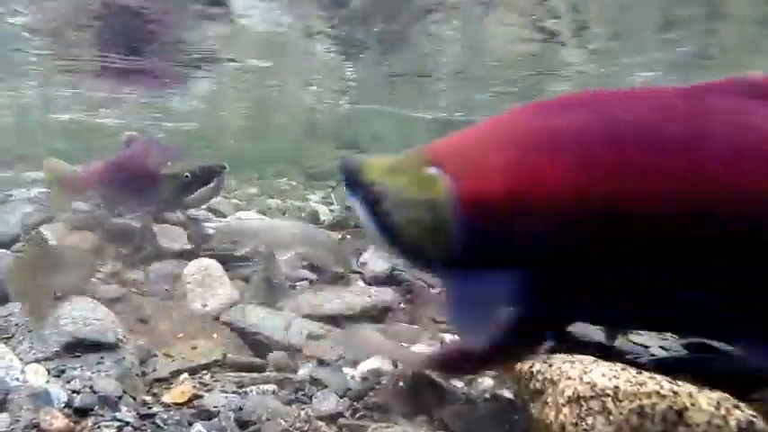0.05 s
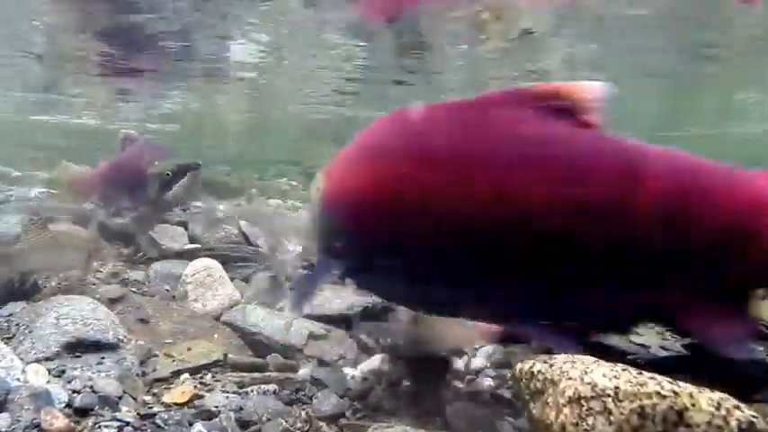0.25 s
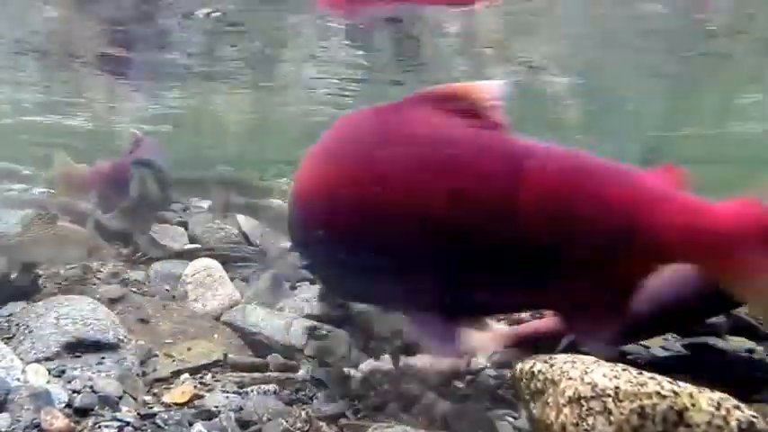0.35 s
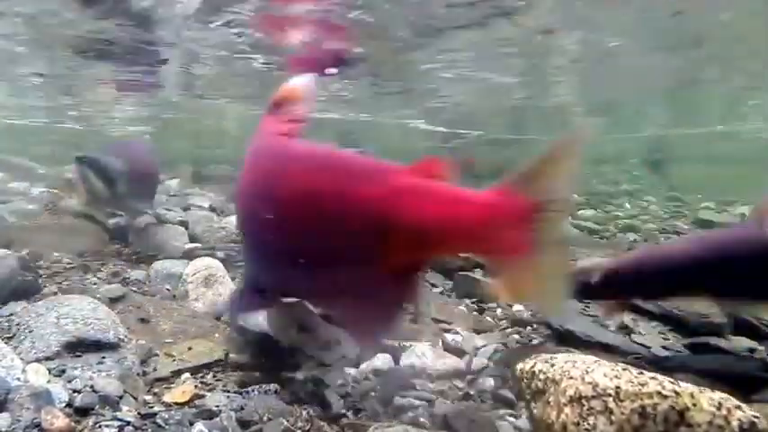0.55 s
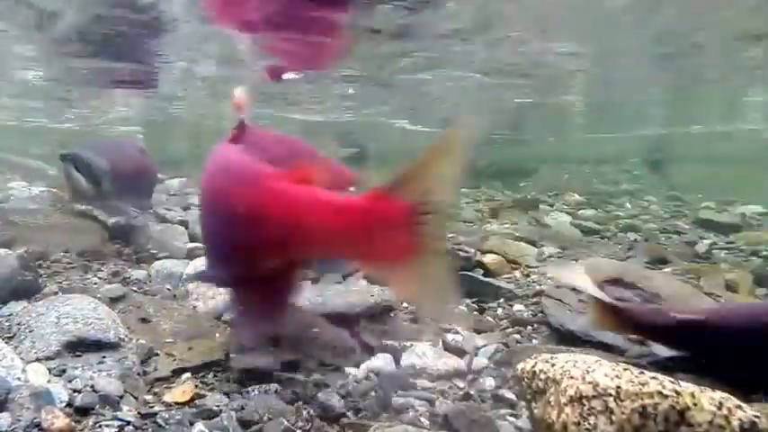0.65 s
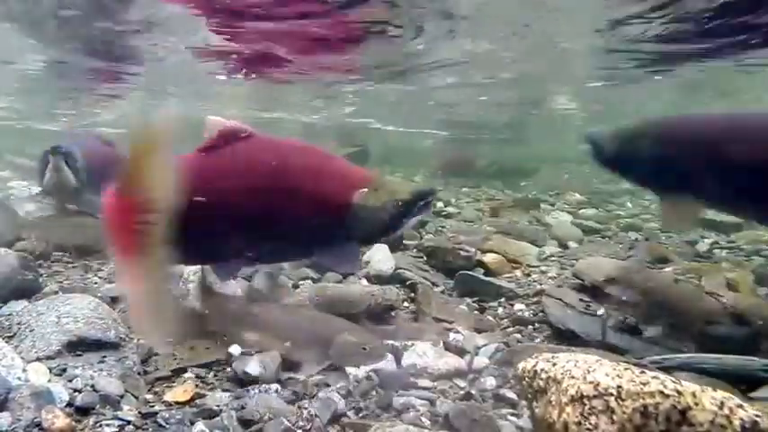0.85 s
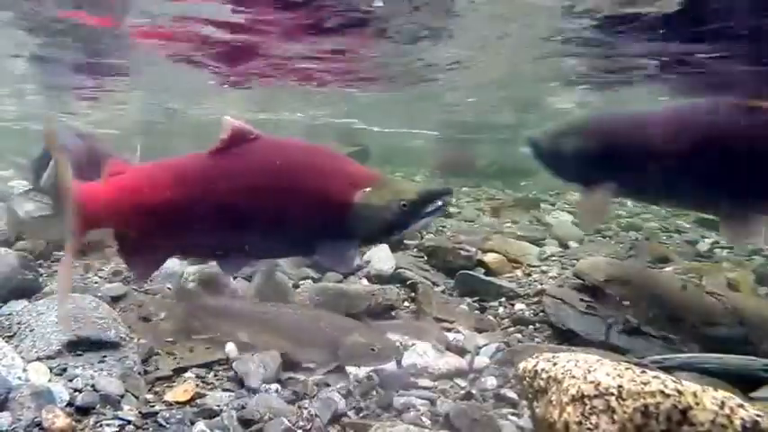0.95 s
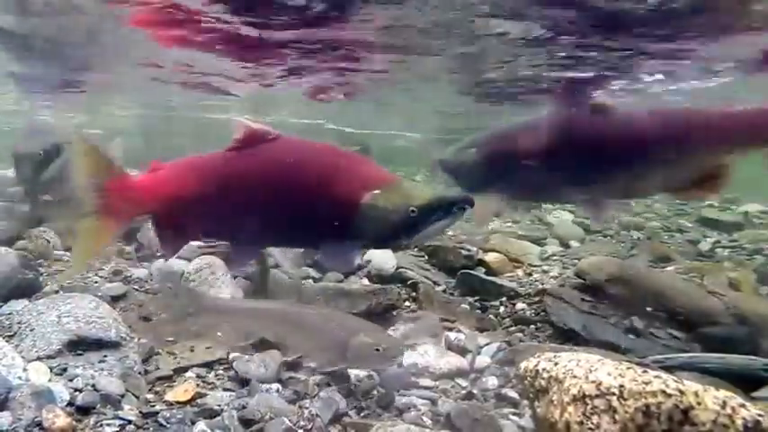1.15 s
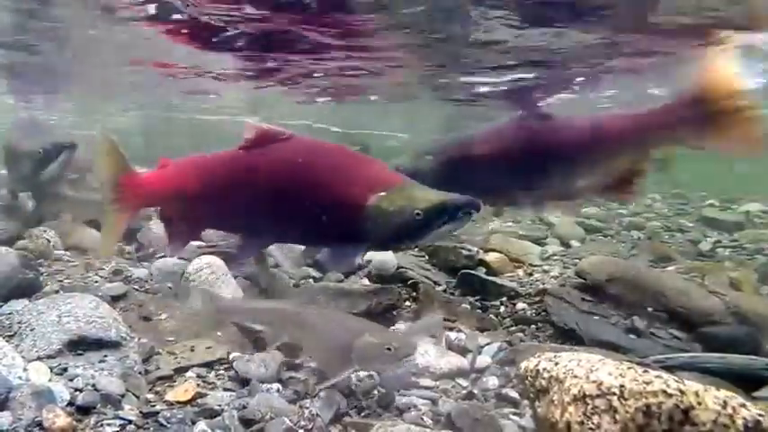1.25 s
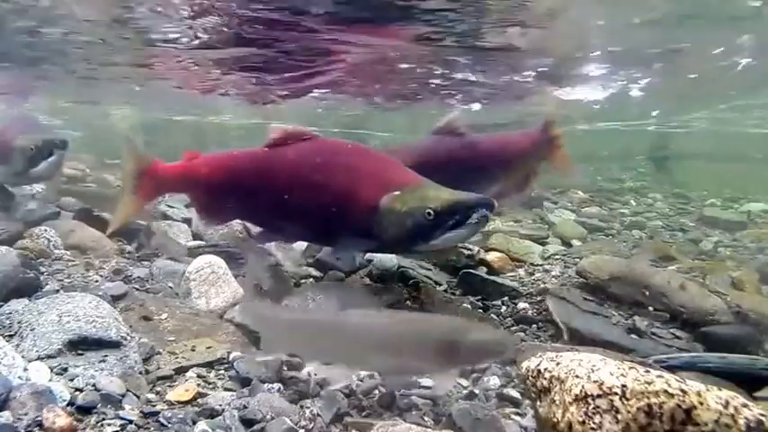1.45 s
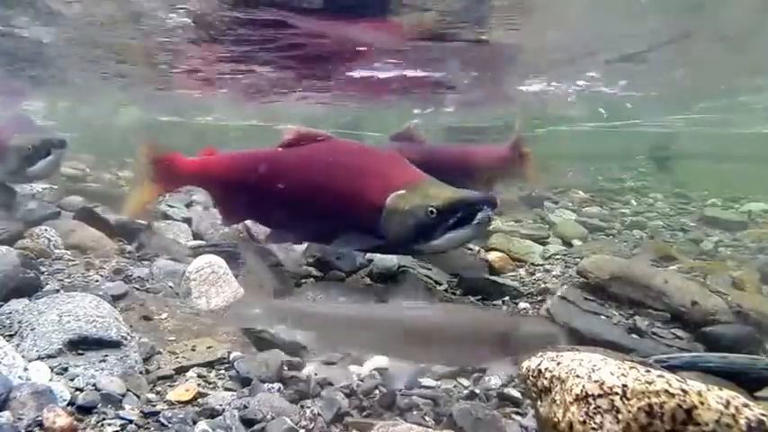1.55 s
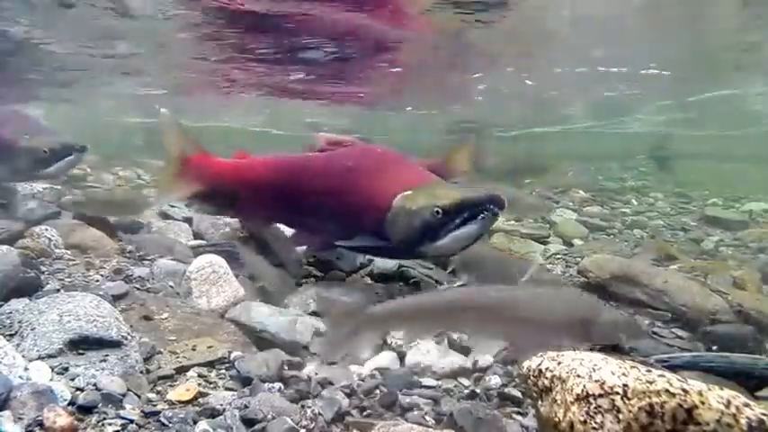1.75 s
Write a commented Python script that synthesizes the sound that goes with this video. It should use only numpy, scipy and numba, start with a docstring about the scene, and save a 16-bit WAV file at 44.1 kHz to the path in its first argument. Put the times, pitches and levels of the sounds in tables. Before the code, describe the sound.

Sharp dry clicks of stones and sand hit a hard housing on a shallow riverbed, clustered early, with low thuds of pushed water, then sparse ticks and tiny bubble pings; microphone inside the housing, under water.

```python
"""In a shallow river, under water, a hard housing with a microphone inside rests on the gravel among large fish.
Their tail beats push water at the housing: a low wobble, made of narrow-band noise and a few short swings.
They also throw stones and sand at it: taps and scrapes shaped by the modes of the housing.
Bubbles ring as short decaying sines over the hiss of the current, noise in flickering octave bands.
The housing lifts one narrow band out of that hiss."""
import sys
import numpy as np
from scipy import signal
from scipy.fft import rfft, irfft
from scipy.io import wavfile
from scipy.ndimage import uniform_filter1d
from numba import njit

SR = 44100
rng = np.random.default_rng(int(sys.argv[2]) if len(sys.argv) > 2 else 0)


def output_pcm(signal):
    """Save a mono or channel-first signal as 16-bit PCM at the path in sys.argv[1].

    Samples are clipped to [-1, 1] before scaling.
    """
    pcm = np.clip(np.atleast_2d(signal).T, -1, 1) * 32767
    wavfile.write(sys.argv[1], SR, np.round(pcm).astype(np.int16))


def makeup_ratio(level_db):
    """Linear amplitude ratio for a level in decibels (20 dB per factor of ten)."""
    decades = np.asarray(level_db, float) / 20
    return 10 ** decades


N = 79380  # length in samples

# Modes of the hard housing: f/Hz, relative level/dB, t60/s, polarity at the microphone (+1 or -1)
HOUSING_MODES = [(523, -22.5, 0.0098, -1), (750, -7.5, 0.018, -1), (1475, -0.5, 0.026, 1),
                 (1958, 1, 0.013, -1), (2314, 6, .011, 1), (2670, 5, 0.0057, -1), (3120, -4, 0.012, -1),
                 (3703, -5.5, .015, -1), (4326, 4, 0.0069, -1), (4760, 6, 0.011, 1), (5120, 9, 0.0035, -1),
                 (6020, -14.5, 0.016, -1), (6540, -5.5, 0.0056, -1), (7284, 3, 0.0061, -1),
                 (9660, -1, 0.0081, 1), (9790, 4, 0.0033, -1), (11120, -2.5, 0.0018, 1),
                 (12000, -21, 0.011, 1), (12900, -17, 0.0044, 1)]
STRIKE_SCATTER_DB = 1.2  # where a small stone or grain lands changes the share of each mode
CURRENT_DB = -58  # rms level of the hiss


def level(x, db):
    """Scale to an rms level."""
    return x * makeup_ratio(db) / np.sqrt(np.mean(x ** 2))


def curve(table, axis):
    """One column of a table, joined by straight lines in time."""
    points = np.array(table)
    return np.interp(np.arange(N) / SR, points[:, 0], points[:, axis])


def add(out, start_s, x):
    """Mix a short sound in at a time."""
    i = int(start_s * SR)
    out[i:i + len(x)] += x[:N - i]


def walk(rate):
    """Random levels held for 1 / rate seconds and smoothed twice; spread near 1."""
    hold = int(SR / rate)
    steps = np.repeat(rng.standard_normal(N // hold + 1), hold)
    smooth = uniform_filter1d(uniform_filter1d(steps, hold), hold)
    return 0.74 * smooth[:N]


@njit
def svf(x, hz, k):
    """State-variable band-pass with a moving centre; k is width over centre."""
    y, band, low = np.empty(len(x)), 0., 0.
    for i in range(len(x)):
        g = np.tan(np.pi * hz[i] / SR)
        v = (band + g * (x[i] - low)) / (1 + g * (g + k))
        band, low, y[i] = 2 * v - band, low + 2 * g * v, k * v
    return y


def ring(tilt_db, contact_us, scatter_db):
    """The housing's answer to one tap: its modes, tilted; a longer contact leaves out the high ones."""
    pivot_hz = 400  # the tilt, in dB per octave, acts above this
    low_cut_hz = 290  # the stiff housing passes little bass from a tap
    hz, db, t60, sign = np.array(HOUSING_MODES).T[:, :, None]
    t = np.arange(4096) / SR
    jf = 1j * np.arange(2049) * SR / 4096

    decay = np.exp(-np.log(1000) * t / t60)
    modes = np.sign(sign) * makeup_ratio(db + scatter_db[:, None]) * np.sin(2 * np.pi * hz * t) * decay
    tilt = (1 + jf / pivot_hz) ** (tilt_db / 6)
    contact = tilt / (1 + 2e-6 * np.pi * jf * abs(contact_us)) ** 4
    bass_cut = (jf / (jf + low_cut_hz)) ** 2
    gain = np.abs(rfft(modes.sum(axis=0)) * contact * bass_cut)

    # Minimum phase, by folding the cepstrum: the energy comes as early as it can
    cepstrum = irfft(np.log(gain + 1e-4 * gain.max()))
    fold = np.r_[1, np.full(2047, 2), 1, np.zeros(2047)]
    return irfft(np.exp(rfft(cepstrum * fold)))[:2048]


def stones():
    """Each stone taps the housing, then scrapes it with a burst of dying noise; both excite the modes."""
    # Stones on the housing: t/s, peak level/dB, tilt/(dB per octave), contact time constant/us,
    # scrape time constant/s
    strikes = [(0.1436, -63, -9, 4.5, 0.0007), (0.1666, -48, 15, 4, 0.0007),
               (0.1792, -35.5, 8.5, 8.7, 0.0015), (0.1831, -38, 7, 4, 0.00098),
               (0.1882, -64, 0, 4, 0.00081), (0.192, -42.5, 8.5, 4, 0.002), (0.1984, -43, 4, 4, 0.0007),
               (0.204, -43, 6, 4, 0.0007), (0.21, -45, 9, 4, 0.00055), (0.2133, -51, 4, 4, 0.0007),
               (0.2229, -53, 12, 4, 0.0007), (0.2293, -25.5, 8.5, 2.9, 0.00058),
               (0.245, -42, 8, 4, 0.00096), (0.2544, -54, 10, 4, 0.0007), (0.2625, -43, 11, 7.9, 0.00079),
               (0.2693, -39, 6.5, 8.4, 0.0021), (0.2868, -37, 6, 9.5, 0.00093), (0.292, -47, 7, 4, 0.00083),
               (0.2986, -54, -2, 4, 0.00064), (0.303, -46, -3, 4, 0.0007), (0.32, -19.5, 9.5, 1.5, 0.00058),
               (0.3455, -48, 3, 4, 0.0007), (0.3607, -45, 9, 4, 0.0007), (0.3652, -51, -10.5, 4, 0.00061),
               (0.3738, -44, 4, 4, 0.00077), (0.378, -35.5, 1.5, 5.4, 0.0008),
               (0.4017, -30, 1, 4.8, 0.0007), (0.403, -28.5, 7, 5.7, 0.0007),
               (0.4051, -33, 7, 4.3, 0.00052), (0.4227, -43, 3, 4.5, 0.0007), (0.428, -37, 2, 8.9, 0.0007),
               (0.4299, -48, 7, 4, 0.0007), (0.4364, -49, 4, 4, 0.0007), (0.4682, -39, 10.5, 2, 0.00041),
               (0.4653, -40, 10.5, 4.4, 0.0014), (0.4952, -42.5, 2, 4, 0.00061),
               (0.501, -43.5, -1, 4, 0.00056), (0.545, -40, 4, 4, 0.00084), (0.5602, -12, 10, 75, 0.000062),
               (0.5723, -65, -12, 3.5, 0.0007), (0.5813, -38, 2, 4, 0.00079), (0.5905, -43, 3, 2.9, 0.0007),
               (0.5981, -23, -2.5, 5.5, 0.0005), (0.6008, -27.5, 10.5, 2.9, 0.0012),
               (0.6063, -42.5, 2, 5.1, 0.0007), (0.6409, -38, -5, 3.2, 0.0021), (0.6536, -44, 5, 4, 0.0007),
               (0.655, -33.5, 12, 3.2, 0.00028), (0.6623, -42, -7.5, 3.7, 0.00057),
               (0.6751, -39, 10.5, 4, 0.00082), (0.6874, -22.5, 0.5, 83, 0.000076),
               (0.6914, -30.5, 3, 2.1, 0.00065), (0.7124, -35.5, -1, 4, 0.00081),
               (0.716, -52, -7, 4, 0.00084), (0.7243, -41, -3, 4, 0.00058), (0.7279, -41, 5, 4, 0.00061),
               (0.7349, -40.5, -6, 4.6, 0.001), (0.7389, -30.5, 5, 3.3, 0.00054),
               (0.7511, -41, -2, 4, 0.0007), (0.7951, -38, 7, 9.2, 0.0012), (0.845, -46, 1, 4, 0.00057),
               (0.916, -43, -4.5, 7.4, 0.00029), (0.9918, -42, 1, 4, 0.00058), (1.065, -45, 4, 4, 0.00064),
               (1.0943, -45, 1.5, 4, 0.00049), (1.3705, -52.5, 12.5, 3.4, 0.00078),
               (1.42, -69, 2, 4, 0.0007), (1.669, -58, 4, 4.5, 0.00082)]
    scrape_share = .18  # scrape over tap
    broad_stone_us = 15  # contact time of a stone broad enough to halve the scatter
    out, t = np.zeros(N), np.arange(256) / SR
    for start_s, db, tilt_db, contact_us, scrape_s in strikes:
        push = scrape_share * rng.standard_normal(256) * np.exp(-t / max(scrape_s, 1e-5))
        push[0] = 1  # the tap itself
        spread_db = STRIKE_SCATTER_DB / (1 + (contact_us / broad_stone_us) ** 2)
        scatter_db = spread_db * rng.standard_normal(len(HOUSING_MODES))
        hit = np.convolve(push, ring(tilt_db, contact_us, scatter_db))
        add(out, start_s, makeup_ratio(db) * hit / np.abs(hit).max())
    return out


def sand():
    """A rain of tiny random taps on the housing, louder while the water is stirred."""
    # How hard the water stirs the sand: t/s, rms level/dB
    stir = [(0, -79), (.13, -66.5), (.17, -58.5), (.22, -59), (.3, -65.5), (.34, -72), (.43, -63.5),
            (.48, -69), (.55, -65), (.62, -73), (.65, -54.5), (.74, -62.5), (.78, -63), (.87, -65),
            (1.1, -71), (1.4, -73), (1.8, -79)]
    grains_per_s = 350  # of each size
    grain_spread_db, grain_top_db = 5.5, 13  # mean of the random boost, and its limit
    patter = 0
    for tilt_db in (-1.5, 2.5, 6):  # dB per octave; three sizes, the finer the brighter
        size = makeup_ratio(np.minimum(grain_spread_db * rng.exponential(size=N), grain_top_db))
        lands = rng.random(N) < grains_per_s / SR
        taps = lands * size * rng.choice([-1, 1], size=N)
        scatter_db = STRIKE_SCATTER_DB * rng.standard_normal(len(HOUSING_MODES))
        grain = ring(tilt_db, 6.2, scatter_db)
        patter = patter + level(signal.fftconvolve(taps, grain)[:N], 0)
    return level(patter, 0) * makeup_ratio(curve(stir, axis=1))


def surge():
    """The housing rocks near one moving low frequency, as noise in a narrow band, when water is pushed past."""
    # Water pushing at the housing: t/s, level ahead of the last band-pass/dB, wobble f/Hz
    pushes = [(0, -69.5, 72), (.1, -55.5, 69), (.19, -42, 69), (.22, -45, 73), (.28, -60.5, 74),
              (.324, -51, 70.5), (.366, -54.5, 73.4), (.4, -64, 75), (.45, -47.5, 69), (.486, -64, 64),
              (.51, -43.5, 63.4), (.56, -43, 62), (.59, -37, 71), (.626, -50, 69), (.68, -41, 67),
              (.72, -38, 67.4), (.766, -53, 67), (.816, -42.5, 62.6), (.886, -61, 63), (1.0, -58, 74),
              (1.072, -60, 71), (1.128, -57.5, 67.5), (1.162, -71, 66.5), (1.222, -64, 67),
              (1.428, -69, 82), (1.688, -66.5, 74), (1.768, -50.5, 73), (1.8, -78, 71.5)]
    width = .55  # band width over centre
    evenness = .85  # how steady the swing is (0-1)
    hz = curve(pushes, axis=2)
    wobble = svf(svf(rng.standard_normal(N), hz, width), hz, width)
    swing = uniform_filter1d(np.abs(signal.hilbert(wobble)), SR // 100)
    wobble = level(wobble / swing ** evenness, 0) * makeup_ratio(curve(pushes, axis=1))
    # The housing follows neither slower nor faster pushes than this band, in Hz
    follow = signal.butter(2, [22, 130], "band", fs=SR, output="sos")
    return signal.sosfiltfilt(follow, wobble)


def shoves():
    """Strong tail beats rock the housing: a sine that swells and dies within a few cycles."""
    # Shoves: t of the middle/s, envelope peak/dB, f/Hz, time from the middle to 1/e/s
    tail_beats = [(0.323, -39, 73.6, 0.013), (0.68, -23.5, 59, 0.015), (1.042, -40.5, 73.6, 0.0078)]
    t, out = np.arange(N) / SR, np.zeros(N)
    for middle_s, db, hz, half_s in tail_beats:
        envelope = np.exp(-((t - middle_s) / half_s) ** 2)
        out -= makeup_ratio(db) * np.sin(2 * np.pi * hz * (t - middle_s) + 1) * envelope
    return out


def bubbles():
    """Bubbles ring as short, nearly pure pings: sines with a soft start and an exponential decay."""
    # Bubbles: t/s, level ahead of rise and decay/dB, f/Hz, t60/s
    pings = [(0.851, -53, 5900, 0.021), (0.921, -61, 6000, 0.071), (.955, -62, 6000, 0.035),
             (1.012, -58, 5870, .03), (1.186, -56, 6080, 0.037), (1.224, -61, 5950, 0.039),
             (1.261, -62, 5930, .04), (1.3, -59, 6000, .03), (1.302, -46.5, 1430, 0.025),
             (1.352, -60, 6000, .02), (1.382, -57.5, 6040, .03), (1.392, -50, 2270, 0.032),
             (1.454, -53, 1950, 0.049), (1.496, -54, 1510, 0.048)]
    rise_s = 0.0025
    out, t = np.zeros(N), np.arange(SR // 10) / SR
    for start_s, db, hz, t60 in pings:
        envelope = (1 - np.exp(-t / rise_s)) * np.exp(-np.log(1000) * t / t60)
        add(out, start_s, makeup_ratio(db) * np.sin(2 * np.pi * hz * t) * envelope)
    return out


def cavity():
    """A narrow band that the housing lifts out of the hiss: band-passed noise, flickering."""
    centre_hz, width = 5150, .04  # width over centre
    band = svf(rng.standard_normal(N), np.full(N, float(centre_hz)), width)
    return level(band * makeup_ratio(2.5 * walk(25)), CURRENT_DB - 19)


def current():
    """The river's flow: coloured hiss in octave bands that swell together and flicker alone."""
    # Colour of the hiss: f/Hz, relative level per Hz/dB
    colour = [(15, -67), (25, 1.5), (114, -2), (249, -7), (463, -10.5), (560, -11.5), (1190, -16),
              (1440, -17.5), (1700, -17), (6050, -29), (14000, -39), (16000, -53)]
    swell_db, flicker_db = .7, 1.0
    f = np.maximum(np.arange(N // 2 + 1) * SR / N, 1)
    hz, db = np.array(colour).T
    spectrum = makeup_ratio(np.interp(np.log(f), np.log(hz), db)) * rfft(rng.standard_normal(N))
    octave = np.clip(np.log2(f / 40), 0, 8)
    swell = swell_db * walk(0.5)
    hiss = np.zeros(N)
    for k in range(9):
        share = np.maximum(1 - np.abs(octave - k), 0)  # neighbouring bands cross-fade
        hiss += irfft(spectrum * share, N) * makeup_ratio(swell + flicker_db * walk(11.45))
    return level(hiss, CURRENT_DB)


def scene():
    """Everything reaches one microphone inside the housing."""
    hits = stones() + sand()
    rocking = surge() + shoves()
    water = bubbles() + cavity() + current()
    return (hits + rocking + water)[None, :]


def band_limit(x):
    """A steep low-pass at the top of the band."""
    return signal.sosfilt(signal.butter(12, 16480, fs=SR, output="sos"), x)


def record(dry):
    """The microphone's top end: a steep low-pass at 14500 Hz."""
    top_end = signal.butter(8, 14500, fs=SR, output="sos")
    mix = signal.sosfilt(top_end, dry)
    return band_limit(mix)


dry = scene()
out = record(dry)
output_pcm(out)
```